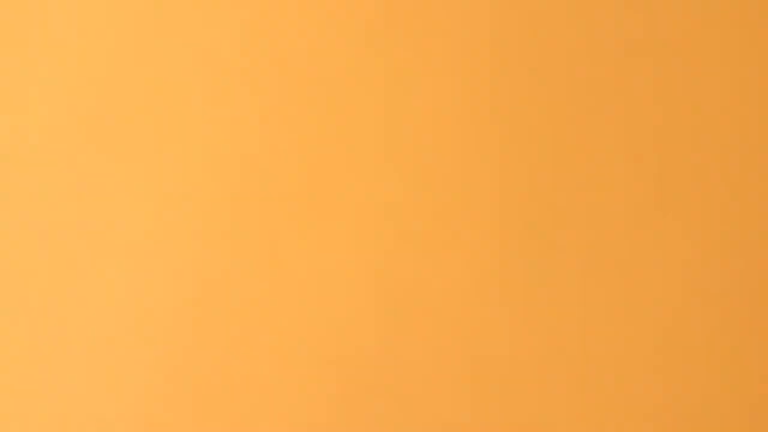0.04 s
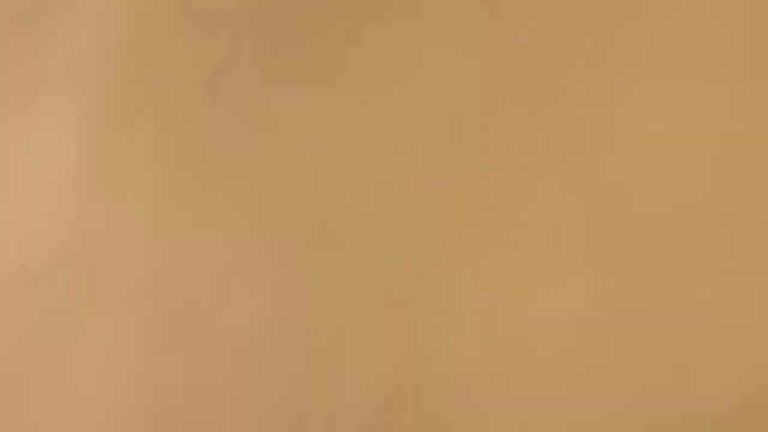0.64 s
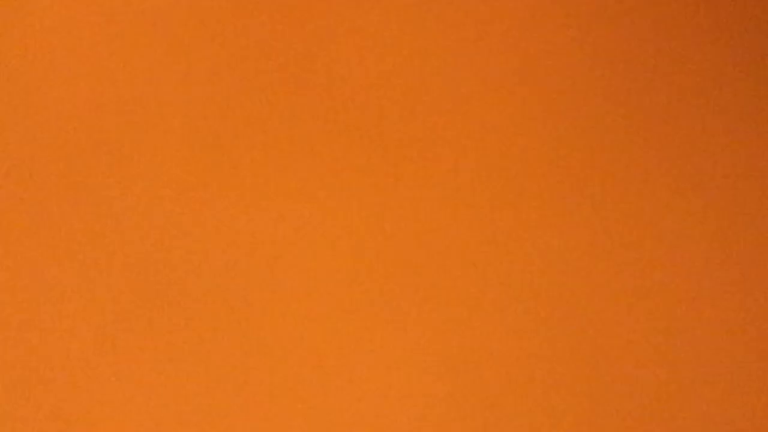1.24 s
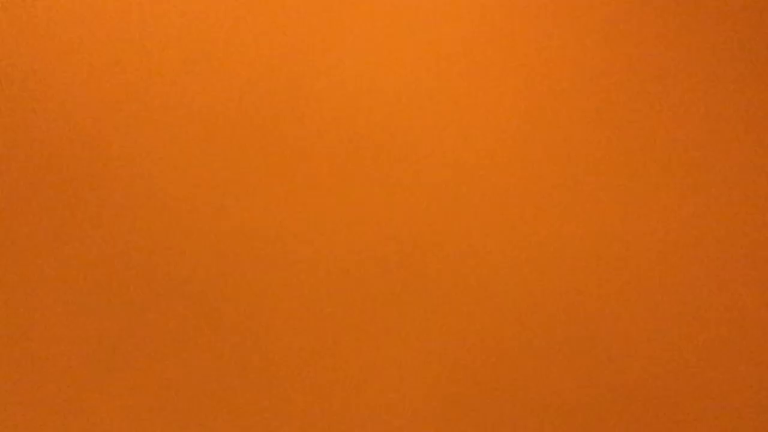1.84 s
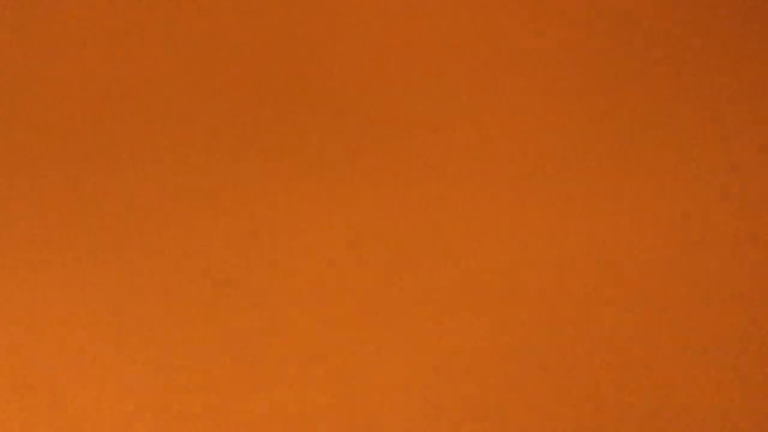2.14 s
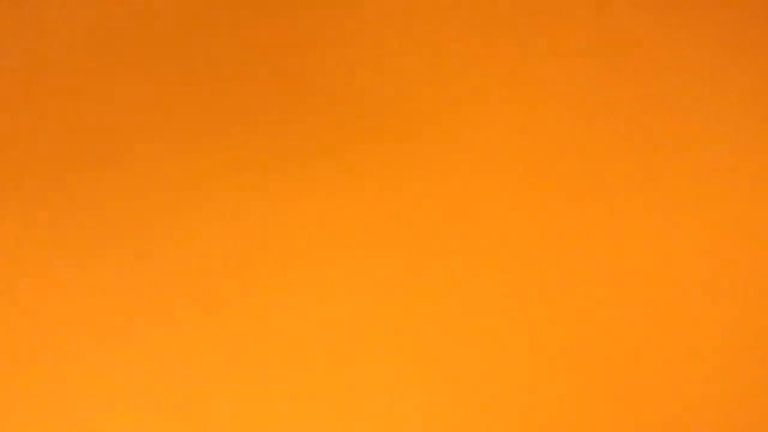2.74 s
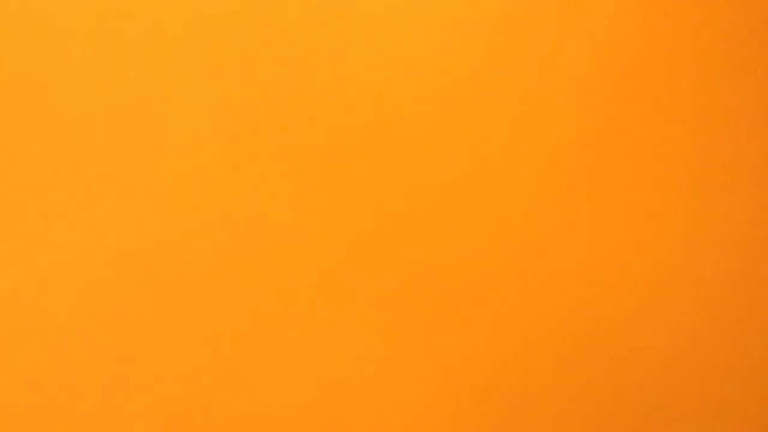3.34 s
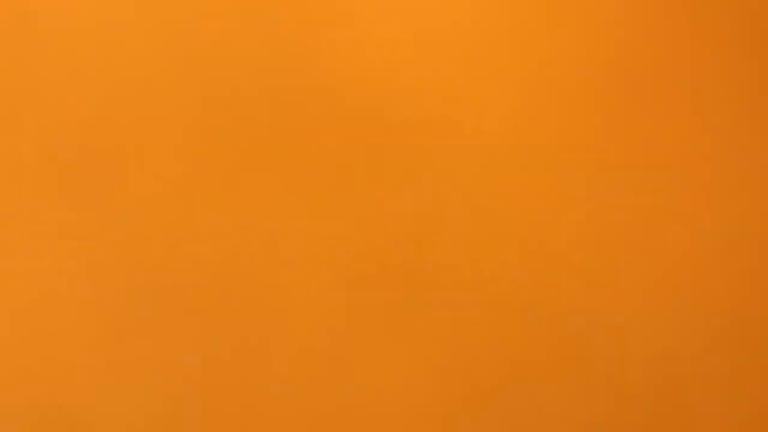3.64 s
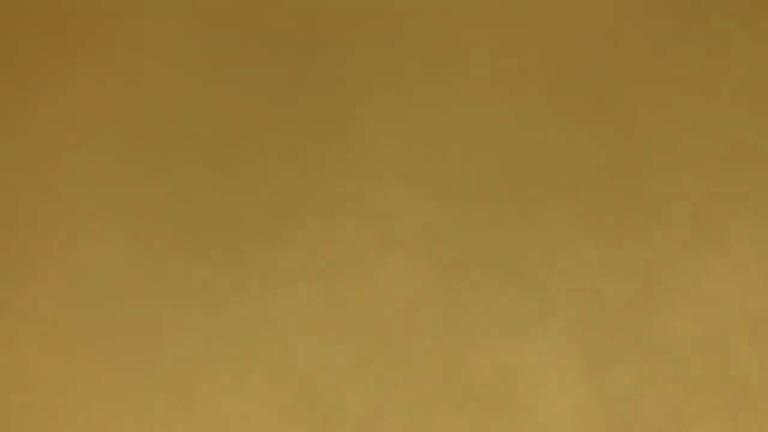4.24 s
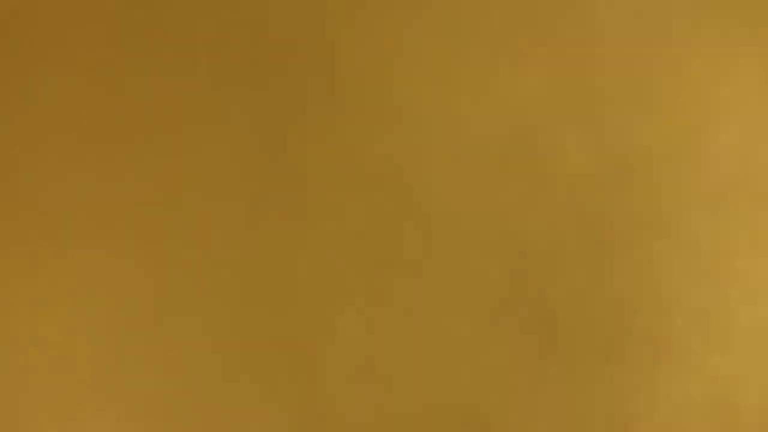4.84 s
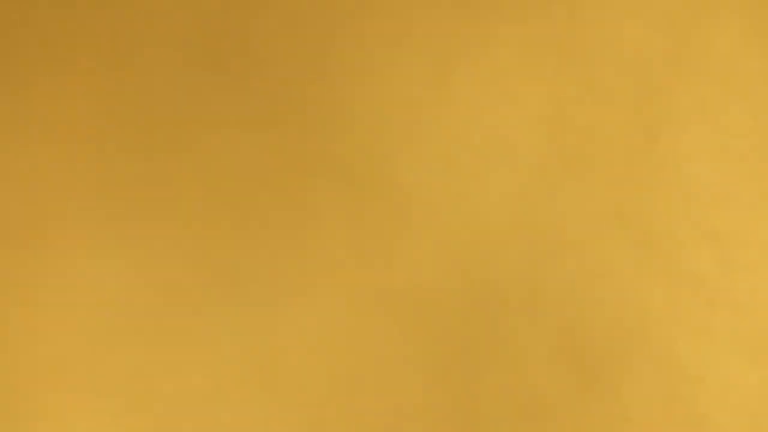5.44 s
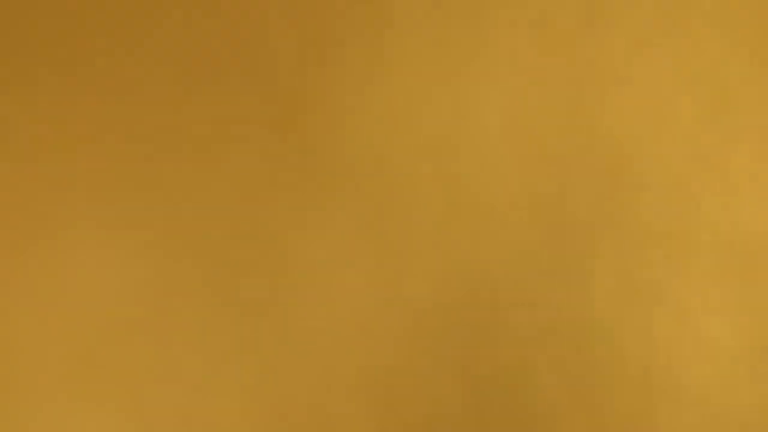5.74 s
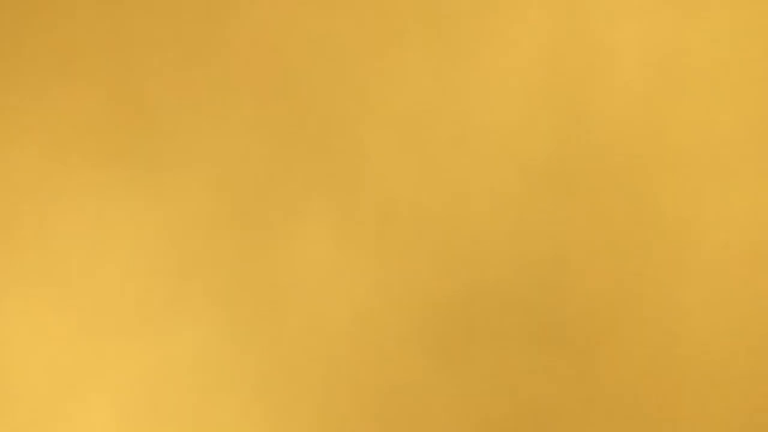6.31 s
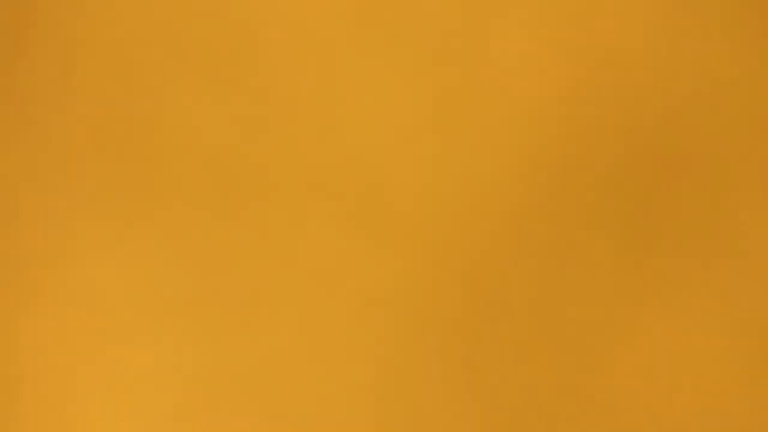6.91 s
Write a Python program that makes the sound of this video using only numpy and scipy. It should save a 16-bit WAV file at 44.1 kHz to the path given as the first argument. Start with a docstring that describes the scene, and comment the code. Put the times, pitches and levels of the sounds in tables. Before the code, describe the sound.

Muffled underwater rumble and churning surf around a tumbling phone, with soft knocks on sand, glugging bubbles and two abrupt dropouts.

```python
"""Shallow surf, under water, heard from the microphone of a tumbling phone.
Eddies buffet the case with a deep rumble; churning water rings the air trapped at the microphone,
over a dull wash of foam. Two brief, abrupt silences part three stretches: in the first a wave
swells and breaks, in the second the case knocks on the sand and bubbles glug, the third churns on."""
import sys
import numpy as np
from scipy import signal
from scipy.fft import rfft, irfft, next_fast_len
from scipy.io import wavfile
from scipy.ndimage import uniform_filter1d

SR = 44100
rng = np.random.default_rng(int(sys.argv[2]) if len(sys.argv) > 2 else 0)


def master(y):
    """Save y as 16-bit WAV."""
    cut = np.clip(np.atleast_2d(y).T, -1, 1)
    pcm = np.round(cut * 32767)  # scale
    wavfile.write(sys.argv[1], SR, pcm.astype(np.int16))


N = 307377
T = np.arange(N) / SR

# the stretches of sound: (start [s], end [s])
STRETCHES = [(0, 1.158), (1.204, 3.712), (3.758, 6.97)]
# rumble of the current past the case, a curve per stretch: (time [s], level [dB])
CURRENT_LEVELS = [
    [(0.0, -26), (0.26, -22), (0.48, -28), (0.64, -25.5), (1.16, -26.5)],
    [(1.2, -26.5), (1.85, -25), (2.02, -33.5), (2.62, -28.5), (2.84, -36.5), (3.0, -27.5), (3.71, -26.5)],
    [(3.76, -16.5), (4.45, -19), (5.2, -20), (5.7, -24.5), (6.1, -22), (6.37, -24.5), (6.55, -22),
     (6.97, -21)],
]
# spectrum of the buffeting, per stretch: (frequency [Hz], level [dB])
EDDY_SPECTRA = [
    [(12, -35), (35, -16), (65, -0.5), (90, -6.5), (135, -22.5), (200, -27.5), (600, -88.5)],
    [(15, -43), (33, -18), (54, -2.5), (72, -0.5), (90, -10.5), (115, -14.5), (400, -86)],
    [(20, -67), (40, -24), (56, -3), (70, -2), (95, -5), (125, -17), (155, -29), (400, -96)],
]
# water between sloshes, a row per stretch: (churn [dB], foam [dB], fizz [dB], churn per current [dB/dB])
CALM_WATER = [(-32.5, -44, -56.5, 0.1), (-39, -49.5, -60.5, 0.8), (-32, -50, -63.5, -0.28)]
# water sloshing over the case, the largest being the breaking wave:
# (crest [s], half length [s], churn [dB], foam [dB], fizz [dB])
SLOSH_CRESTS = [(0.407, 0.042, -24, -42.5, -57), (0.546, 0.042, -28, -47, -61),
                (0.812, 0.074, -24.5, -38.5, -49.5), (1.059, 0.17, -15.5, -28, -41.5),
                (1.293, 0.16, -30, -46.5, -55.5), (1.59, 0.1, -27.5, -46, -51),
                (1.807, 0.13, -28.5, -48, -68), (2.118, 0.048, -31.5, -55, -65),
                (2.278, 0.12, -31, -70, -70.5), (2.726, .13, -43.5, -47, -61.5),
                (3.06, 0.12, -34.5, -42.5, -68), (3.42, .1, -36, -51.5, -64.5),
                (3.654, 0.15, -40.5, -51.5, -58.5), (4.174, 0.21, -48.5, -48, -60),
                (4.51, 0.06, -31.5, -61.5, -66), (5.02, 0.21, -34.5, -51, -64.5),
                (5.18, 0.016, -27.5, -42, -52.5), (5.927, 0.099, -31.5, -44, -59.5),
                (6.403, 0.26, -36, -48.5, -73.5), (6.898, 0.12, -34.5, -45.5, -61)]
# resonances of the air trapped at the microphone, per stretch: (frequency [Hz], width [Hz], level [dB])
AIR_POCKET_MODES = [
    [(374.4, 141, 1), (243, 130, -10)],
    [(336.7, 69, -0.5), (239.7, 65, -5.5)],
    [(398, 60.5, 1), (283, 207, -13.5)],
]
# spectra of the foam and of its fizz, per stretch: (frequency [Hz], level [dB])
FOAM_SPECTRA = [
    [(70, -12.5), (140, 9.5), (500, 0), (700, -3), (880, -1), (1050, -6), (1400, -17.5), (2500, -58.5)],
    [(70, -12.5), (140, 4.5), (450, 1.5), (540, 6.5), (640, -2.5), (880, -1), (1120, -11.5), (2500, -57.5)],
    [(70, -12), (160, 6.5), (560, 4.5), (700, -5), (950, 1.5), (1130, -10), (1400, -27.5), (2500, -55)],
]
FIZZ_SPECTRA = [
    [(800, -31), (1280, -1), (1500, -3), (1750, -14), (2400, -16), (2700, -25), (4200, -30), (6000, -57)],
    [(800, -36), (1300, 1.5), (1600, -6), (2000, -12), (2600, -24.5), (5000, -59.5)],
    [(800, -34.5), (1200, -1.5), (1500, -4), (1750, -11), (2500, -24.5), (5000, -56)],
]
# spells of stronger hiss: (start [s], end [s], first level [dB], last level [dB])
HISS_SPELLS = [(0.26, 0.668, -61, -60.5), (0.984, 1.168, -61.5, -63), (3.76, 4.335, -69, -62.5)]
# spectrum of the hiss: (frequency [Hz], level [dB])
HISS_SPECTRUM = [(500, 5.5), (2700, 5), (4400, 3), (5000, 0.5), (6200, 2), (7700, -2), (9000, -0.5),
                 (10400, -4), (12000, -1), (15500, -2.5)]
# slugs of water hitting the case: (time [s], level [dB], pitch [Hz], length [s])
WATER_THUMPS = [(.05, -13.5, 43.3, 0.098), (.755, -16, 75, .055), (1.005, -10, 61.7, 0.044),
                (1.118, 0, 58.8, 0.034), (1.74, -18, 68.5, .14), (3.17, -20.5, 65, 0.06),
                (3.317, -15, 73.5, 0.055), (3.49, -14, 71.3, 0.081), (3.59, -13, 72.3, 0.065),
                (3.736, -0.5, 67.8, 0.079), (3.8, -7, 79.6, 0.058), (3.914, -10.5, 85.6, 0.055),
                (4.07, -8, 70.4, 0.058), (4.235, -12.5, 73.4, 0.07), (5.044, -11, 79.7, 0.073),
                (5.26, -12.5, 76.2, 0.073), (5.958, -10, 89.5, .042), (6.13, -16, 80.3, 0.14),
                (6.63, -20, 47, 0.17)]
# large bubbles swelling and ringing: (time [s], level [dB], pitch [Hz], length [s])
BUBBLE_GLUGS = [(.105, -26.5, 378, 0.037), (1.752, -18, 308, 0.034), (2.295, -19.5, 333, 0.055),
                (2.635, -30, 289, 0.052), (3.008, -23.5, 288.5, 0.08), (3.205, -24.5, 347, 0.047),
                (3.25, -24.5, 353, 0.047), (3.535, -22, 329, 0.11), (5.6, -22, 415, 0.027),
                (6.825, -29.5, 260, 0.057)]
# small bubbles pinching off nearby: (time [s], level [dB], pitch [Hz])
BUBBLE_PLINKS = [(0.649, -41, 1305), (0.769, -39, 2060), (.814, -23, 1062), (1.007, -17, 1300),
                 (1.53, -36, 1270), (2.408, -44, 1280), (2.665, -31.5, 776), (2.741, -37, 1070),
                 (3.002, -25.5, 529), (3.402, -35.5, 957), (3.532, -38, 763), (4.237, -32, 920)]
# the case knocking on the bed: (time [s], level [dB], pitch [Hz], t60 [s])
BED_KNOCKS = [(0.796, -8, 370, 0.093), (1.009, -2.5, 375, 0.19), (1.086, -5, 343, 0.056),
              (1.214, -17, 337, 0.041), (1.421, -12, 341, 0.065), (1.4822, -3, 353, 0.058),
              (1.544, -9, 312, 0.085), (1.717, -8.5, 309, 0.058), (1.785, -9, 334, 0.067),
              (1.896, -11, 326, 0.028), (2.066, -6, 254, 0.049), (2.244, -20.5, 354, 0.19),
              (2.934, -25.5, 217, 0.24), (3.316, -13, 384, 0.047), (3.381, -11.5, 294, 0.049),
              (4.948, -18.5, 398, 0.052), (5.175, -9.5, 418, 0.079)]
# snaps at the edges of the silences: (time [s], step [dB])
EDGE_SNAPS = [(1.1588, -23.5), (1.204, -32), (3.7115, -18.5), (3.758, -13.5)]
# faint, sharp ticks with a brief ring: (time [s], ring level [dB], brightness [dB/octave], click [dB])
SHARP_TICKS = [(1.843, -47, 3.5, -49), (2.847, -40, 2, -46), (3.149, -34.5, 0.5, -40),
               (4.586, -47, 3.5, -56), (5.044, -42, 0, -62.5), (5.22, -41.5, 2, -48),
               (5.6803, -30.5, -1.5, -49), (6.224, -43.5, 2.5, -47)]
# the brief ring of a sharp tick: (frequency [Hz], level [dB], t60 [s])
TICK_MODES = [(935, 4, 0.015), (1480, -5, 0.012), (2180, -4.5, 0.0075), (3240, -16, 0.0071),
              (4340, -22, 0.011)]


def gain_of(db):
    """Decibels to amplitude."""
    return 10 ** (np.asarray(db) / 20)


def add(mix, s, sound):
    """Mixes a sound in at time s."""
    part = mix[max(round(s * SR), 0):][:len(sound)]
    part += sound[:len(part)]


def follow(curve):
    """A curve of (time, value) points, sample by sample."""
    return np.interp(T, *np.transpose(curve))


def gate(start, end, fade_s=0.0012):
    """One between start and end, zero outside."""
    inside = np.clip(np.minimum(T - start, end - T) / fade_s, 0, 1)
    return np.sin(np.pi / 2 * inside) ** 2


def coloured(x, spectrum):
    """Filters x by a spectrum and brings it to rms 1."""
    hz, db = np.transpose(spectrum)
    size = next_fast_len(len(x))
    bins_hz = np.fft.rfftfreq(size, 1 / SR)
    response = gain_of(np.interp(np.log(bins_hz + 1), np.log(hz), db))
    y = irfft(rfft(x, size) * response, size)[:len(x)]
    return y / y.std()


def steadied(x, window_s):
    """Holds the rms near 1 over the window and keeps the faster flutter."""
    size = int(window_s * SR)
    power = uniform_filter1d(uniform_filter1d(x ** 2, size), size // 2)
    return x / np.sqrt(abs(power) + 1e-12)


def resonate(x, hz, width):
    """A two-pole resonance of gain 1."""
    return signal.lfilter(*signal.iirpeak(hz, hz / width, fs=SR), x)


def pops(per_s, spread_db):
    """Random clicks, many small and a few large."""
    size = gain_of(spread_db * np.minimum(rng.exponential(1, N), 4))
    return size * rng.choice([-1., 1.], N) * (rng.random(N) < per_s / SR)


def eddies(db, spectrum):
    """Turbulent pressure right on the case: a narrow, fluttering rumble."""
    return gain_of(db) * steadied(coloured(rng.standard_normal(N), spectrum), window_s=0.23)


def stirring(current_db, calm, start, end, reference_db=-26, foam_follow=0.2):
    """Levels of churn, foam and fizz: each varies with the current; sloshes swell and ebb on top."""
    *calm_db, churn_follow = calm
    shift_db = np.outer([churn_follow, foam_follow, foam_follow], current_db - reference_db)
    power = gain_of(np.array(calm_db)[:, None] + shift_db) ** 2
    for crest, half_length, *levels_db in SLOSH_CRESTS:
        if start <= crest <= end:
            swell = np.exp(-((T - crest) / half_length) ** 2)
            power += np.outer(gain_of(levels_db) ** 2, swell)
    return 10 * np.log10(power)


def churn(db, modes, muffle_hz=900):
    """Collapsing bubbles ring the air trapped at the microphone; the water muffles the top."""
    ring = 0
    for hz, width, mode_db in modes:
        collapses = pops(per_s=1200, spread_db=3)
        ring += gain_of(mode_db) * resonate(resonate(collapses, hz, width), hz, width)
    ring = signal.sosfilt(signal.butter(2, muffle_hz, fs=SR, output="sos"), ring)
    return gain_of(db) * steadied(ring, window_s=0.14)


def foam(body_db, fizz_db, body_spectrum, fizz_spectrum, bubbles_db):
    """A dense crackle of bursting foam and rolling sand, dulled by the water, with single bubbles."""
    body = steadied(coloured(pops(per_s=1800, spread_db=3), body_spectrum), window_s=0.28)
    fizz = steadied(coloured(pops(per_s=1600, spread_db=2), fizz_spectrum), window_s=0.13)
    wash = gain_of(4) * body + gain_of(bubbles_db) * bubbles()
    return gain_of(body_db) * wash + gain_of(fizz_db - 1.5) * fizz


def bubbles(low_hz=520, high_hz=2300, cycles=11, db_per_octave=-13, sizes=32):
    """Random bubbles of many sizes, each a dying tone; the small high ones are the most muffled."""
    out, t = np.zeros(N), T[:SR // 12]
    for hz in np.geomspace(low_hz, high_hz, sizes):
        tone = (1 - np.exp(-hz * t)) * np.exp(-hz * t / cycles) * np.sin(2 * np.pi * hz * t)
        ringing = signal.oaconvolve(pops(per_s=2, spread_db=5), tone)[:N]
        out += gain_of(db_per_octave * np.log2(hz / low_hz)) * ringing
    return out / out.std()


def hiss(floor_db):
    """A thin noise floor far below the water sounds, stronger for a few spells."""
    power = np.full(N, gain_of(floor_db) ** 2)
    for start, end, first_db, last_db in HISS_SPELLS:
        spell_db = follow([(start, first_db), (end, last_db)])
        power += gate(start, end) * gain_of(spell_db) ** 2
    return np.sqrt(power) * coloured(rng.standard_normal(N), HISS_SPECTRUM)


def ticking(first_s, per_s=20, hz=3200, db=-59):
    """The phone's electronics tick, evenly and very faintly."""
    out, t = np.zeros(N), T[:SR // 700]
    tick = np.hanning(len(t)) * np.sin(2 * np.pi * hz * t)
    for s in np.arange(first_s, T[-1], 1 / per_s):
        add(out, s, gain_of(db) * tick)
    return out


def thumps_or_glugs(rows, glide):
    """A slug of water or a large bubble: a rounded burst whose pitch rises by the fraction glide."""
    out = np.zeros(N)
    for s, db, hz, length in rows:
        progress = np.linspace(0, 1, int(length * SR))
        turns = np.cumsum(hz * (1 + glide * (progress - 0.5))) / SR
        add(out, s, gain_of(db) * np.sin(np.pi * progress) ** 2 * np.sin(2 * np.pi * turns))
    return out


def plinks(cycles=9, rise_s=0.0011):
    """A small bubble pinches off near the microphone and rings at its own pitch for a few cycles."""
    out, t = np.zeros(N), T[:SR // 8]
    for s, db, hz in BUBBLE_PLINKS:
        envelope = (1 - np.exp(-(t / rise_s) ** 2)) * np.exp(-hz * t / cycles)
        add(out, s, gain_of(db) * envelope * np.sin(2 * np.pi * hz * t))
    return out


def knocks(rise_s=0.0033):
    """Each soft blow of the case on the sand briefly rings the air trapped at the microphone."""
    out, t = np.zeros(N), T[:SR // 4]
    for s, db, hz, t60 in BED_KNOCKS:
        envelope = (1 - np.exp(-(t / rise_s) ** 2)) * gain_of(-60 * t / t60)
        add(out, s - rise_s / 2, gain_of(db) * envelope * np.sin(2 * np.pi * hz * t))
    return out


def sharp_ticks(rise_s=0.00029, click_s=0.00006):
    """Faint, sharp ticks: each a dry click with a brief ring, some brighter than others."""
    out, t = np.zeros(N), T[:SR // 30]
    onset = 1 - np.exp(-(t / rise_s) ** 2)
    lowest_hz = TICK_MODES[0][0]
    for s, db, brightness, click_db in SHARP_TICKS:
        add(out, s + rise_s, gain_of(click_db) * np.exp(-t / click_s))
        for hz, mode_db, t60 in TICK_MODES:
            level_db = db + mode_db + brightness * np.log2(hz / lowest_hz)
            add(out, s, gain_of(level_db - 60 * t / t60) * onset * np.sin(2 * np.pi * hz * t))
    return out


def scene():
    """Mono, at the phone: each stretch has its own water; blows, bubbles and ticks fall within it."""
    thumps = thumps_or_glugs(WATER_THUMPS, glide=0.11)
    glugs = thumps_or_glugs(BUBBLE_GLUGS, glide=0.075)
    events = thumps + glugs + plinks() + knocks() + sharp_ticks()
    bubbles_db = [-8, -4.5, -8]  # single bubbles in the foam, by stretch
    hiss_db, first_tick_s = [-69.5, -70.6, -71.7], [0, 0.0415, 0.0205]
    out = np.zeros(N)
    for k, (start, end) in enumerate(STRETCHES):
        current_db = follow(CURRENT_LEVELS[k])
        churn_db, foam_db, fizz_db = stirring(current_db, CALM_WATER[k], start, end)
        water = eddies(current_db, EDDY_SPECTRA[k]) + churn(churn_db, AIR_POCKET_MODES[k])
        froth = foam(foam_db, fizz_db, FOAM_SPECTRA[k], FIZZ_SPECTRA[k], bubbles_db[k])
        noise_floor = hiss(hiss_db[k]) + ticking(first_tick_s[k])
        out += gate(start, end) * (water + froth + events + noise_floor)
    return out[None]


def record(dry, snap_s=0.0034, band_limit_hz=15900):
    """The phone's track: a snap at each edge of a silence, rounded peaks and a band limit."""
    out = dry[0].copy()
    for s, db in EDGE_SNAPS:
        add(out, s, gain_of(db) * np.exp(-T[:SR // 20] / snap_s))
    out = out / (1 + out ** 12) ** (1 / 12)  # only peaks near full scale round off
    lowpass = signal.firwin(511, band_limit_hz, window=("kaiser", 9), fs=SR)
    return signal.oaconvolve(out, lowpass, "same")[None]


dry = scene()
out = record(dry)
master(out)
```